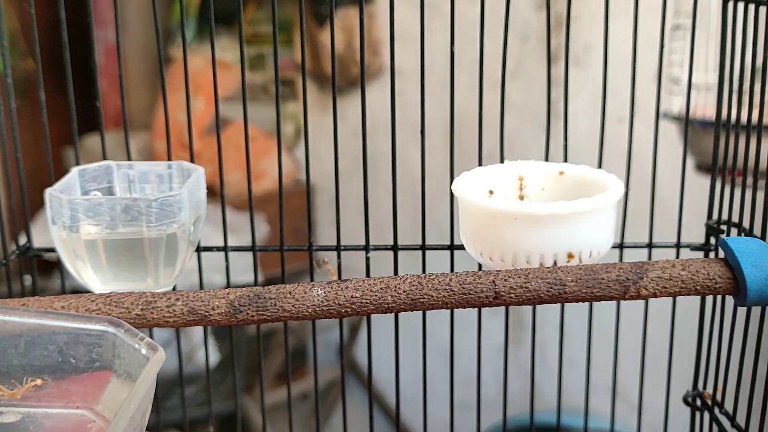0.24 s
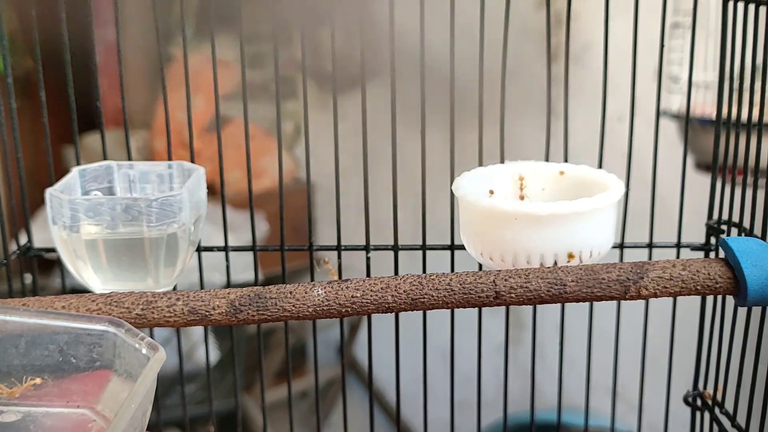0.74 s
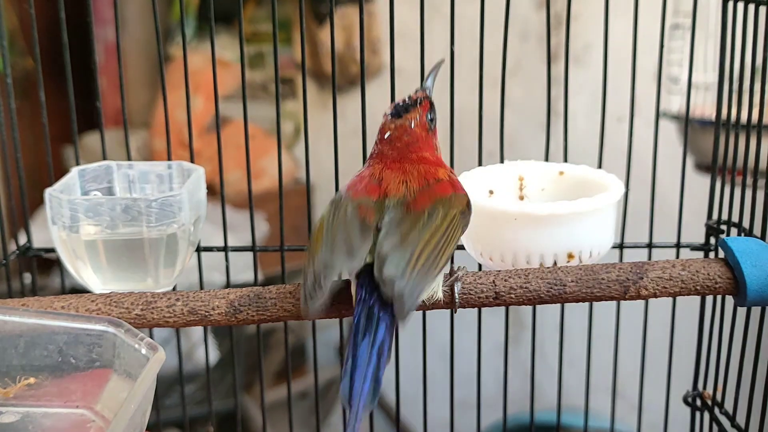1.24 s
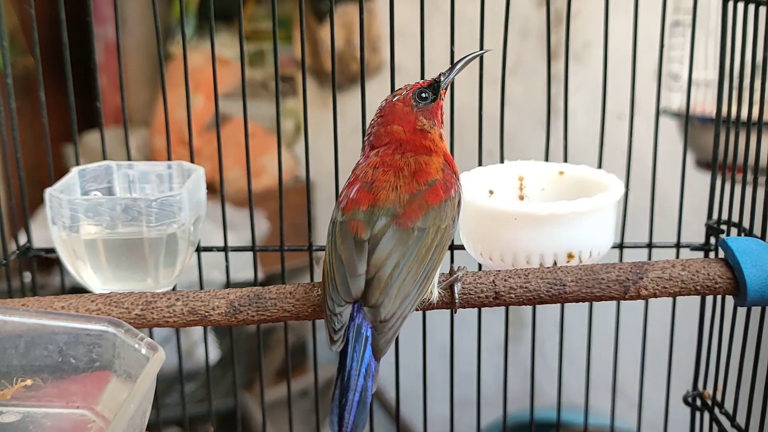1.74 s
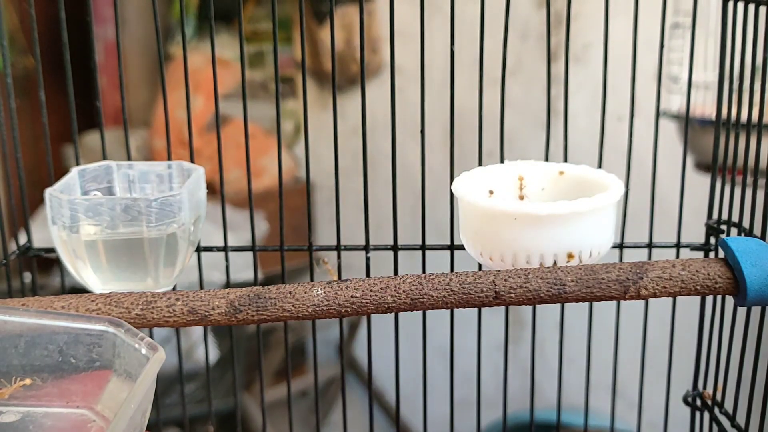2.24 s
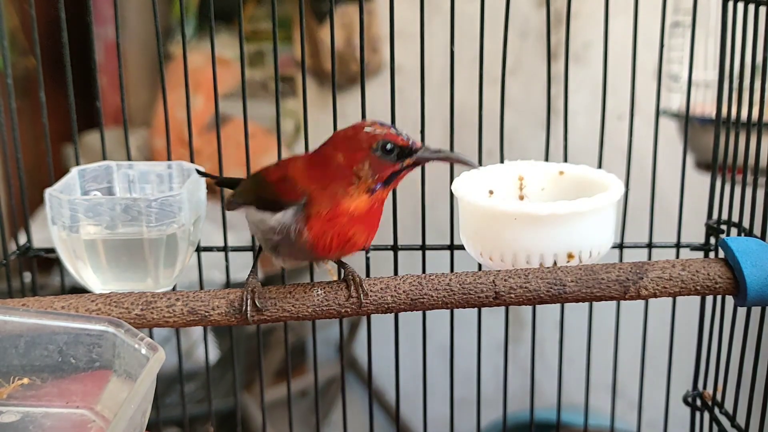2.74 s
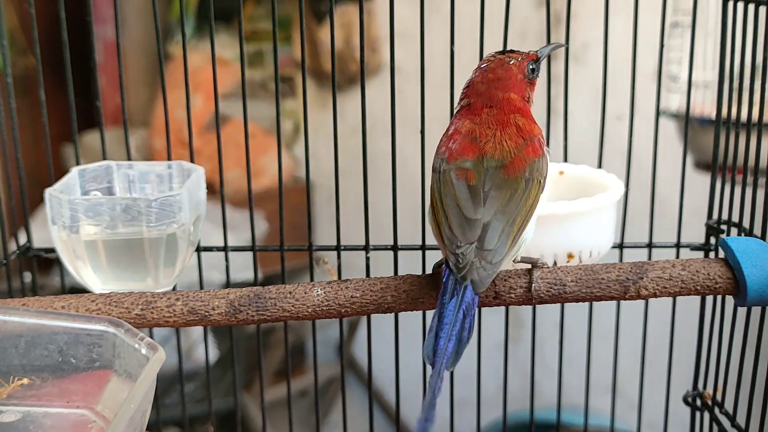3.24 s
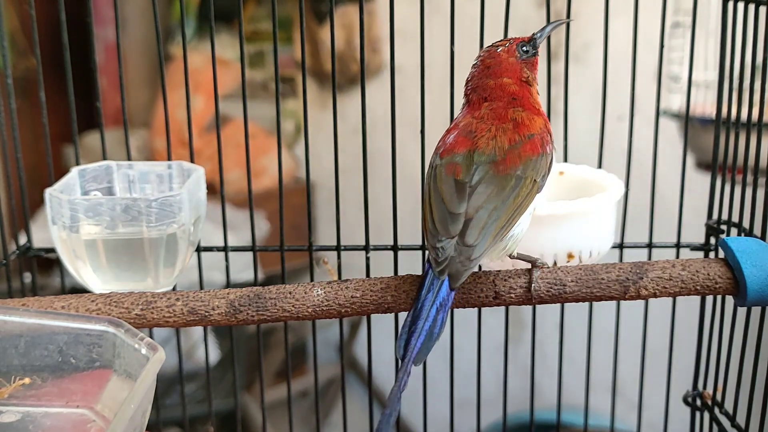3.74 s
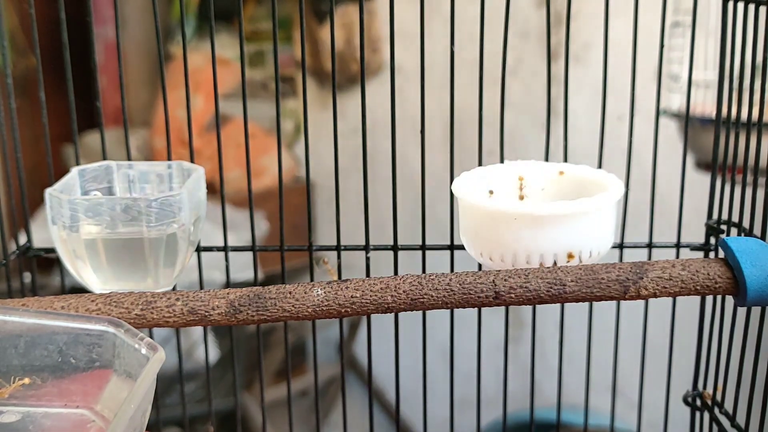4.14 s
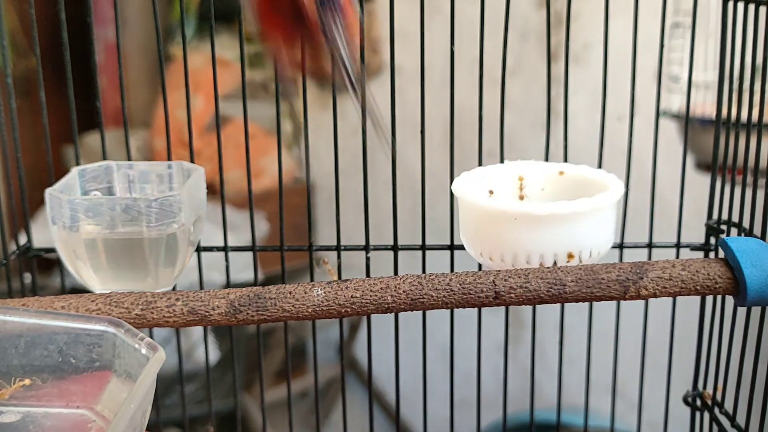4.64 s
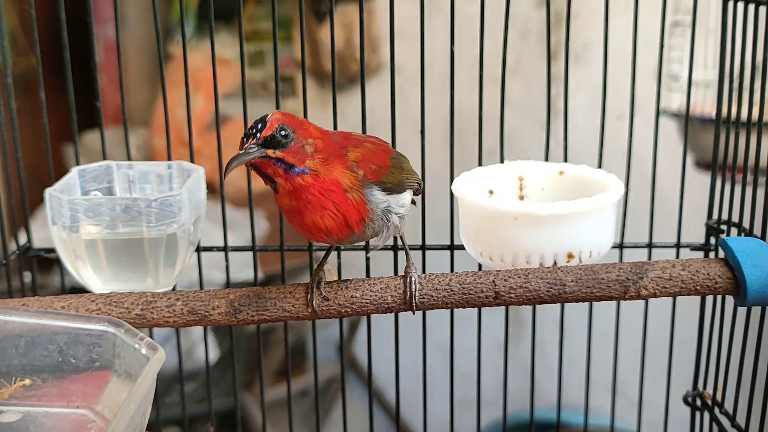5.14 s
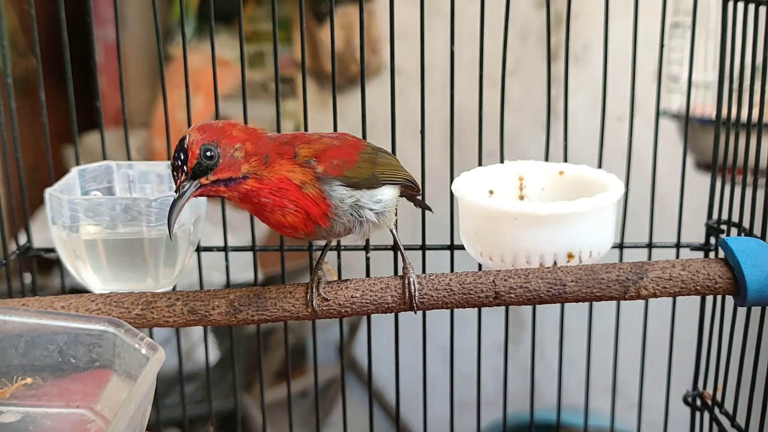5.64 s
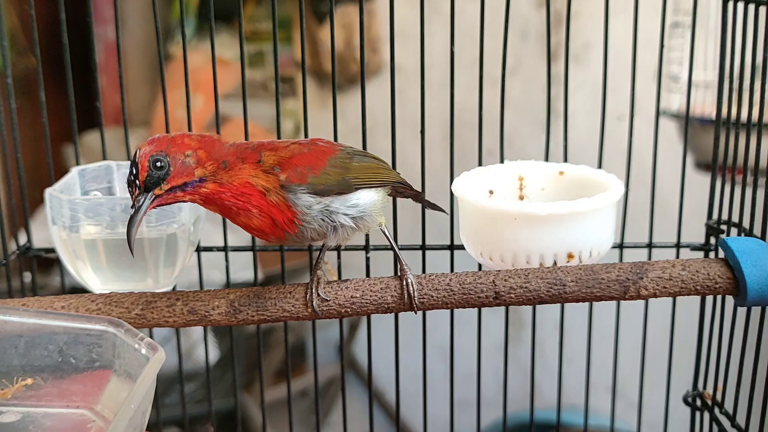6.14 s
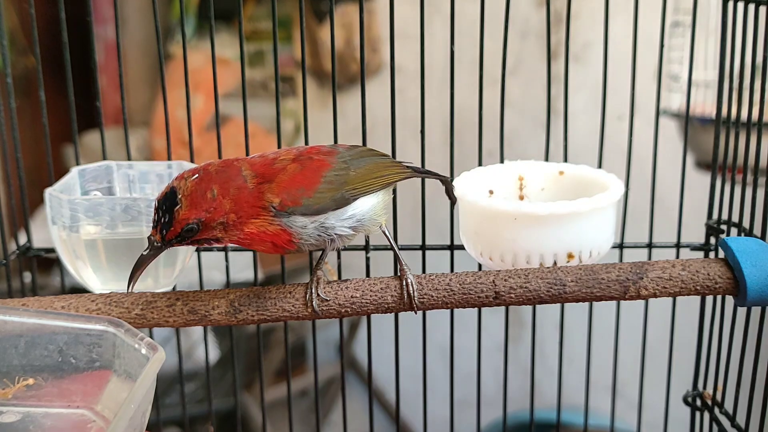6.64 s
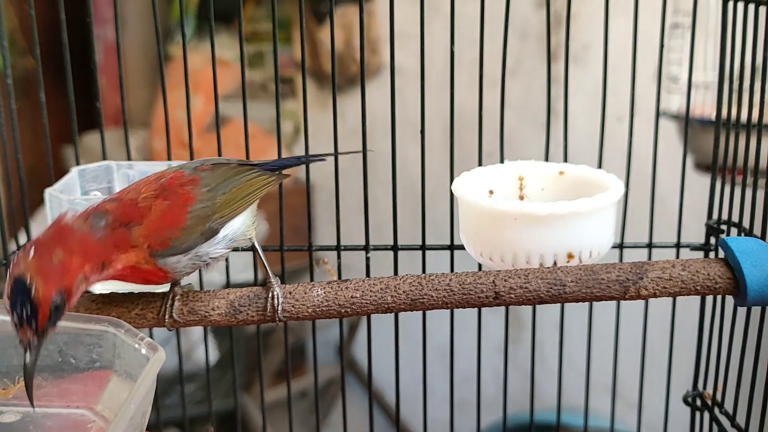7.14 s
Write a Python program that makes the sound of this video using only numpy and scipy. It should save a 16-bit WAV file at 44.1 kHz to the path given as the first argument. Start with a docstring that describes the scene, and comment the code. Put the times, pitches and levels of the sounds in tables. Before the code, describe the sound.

Quiet indoor hum and hiss, with a small bird very near the microphone. Its brief, sharp, high chirps alternate between squeaky rasp and pure whistle, each with a short room echo. They come singly, then in a quick run, then sparsely. Between them are faint wing whirrs, low air puffs and dull woody foot knocks on the perch.

```python
"""A quiet home hums and hisses, and at once a sunbird in a wire cage whistles close to a two-port microphone.
Its syrinx has two sides: one whistles and squeaks in gliding, nearly pure tones, while the other
rasps in pulses whose overtones rise with the pulse rate; surfaces throw the chirps back as echoes.
As it flits about, its feet ring the perch as a sum of decaying modes, its feathers brush the air
as band-passed noise, and its wings push the microphone with slow swings of pressure."""
import sys
import numpy as np
from scipy import signal
from scipy.fft import rfft, irfft
from scipy.io import wavfile
from scipy.ndimage import uniform_filter1d, minimum_filter1d

SR = 44100
rng = np.random.default_rng(int(sys.argv[2]) if len(sys.argv) > 2 else 0)


def generate_wav(signal):
    """Clip the signal to [-1, 1] and save it as 16-bit WAV at the path in sys.argv[1]."""
    frames = np.transpose(np.atleast_2d(signal))
    scaled = np.clip(frames, -1, 1) * 32767
    pcm = np.round(scaled).astype(np.int16)
    wavfile.write(sys.argv[1], SR, pcm)


N = 325458  # length [samples]

# Spectra of the background's three bands: (frequency [Hz], relative density [dB per Hz])
RUMBLE_SPECTRUM = [(12, -23.5), (20, 0), (38, -1.5), (54, -17), (70, -6.5), (102, -8.5), (191, -5.5),
                   (229, -4.5), (360, -9.5), (481, -14), (665, -10.5), (872, -15.5), (1500, -19),
                   (1950, -51.5), (3300, -120)]
HISS_SPECTRUM = [(880, -49), (1500, -12.5), (1660, -2), (1800, -8.5), (1840, -3.5), (1950, -0.5),
                 (2370, -4.5), (2850, -8.5), (3210, -5.5), (6360, -8.5), (7100, -15.5), (7500, -24.5),
                 (9360, -35.5), (15800, -120)]
FIZZ_SPECTRUM = [(4240, -23.5), (7200, -2.5), (7460, -10), (8670, -11), (10200, -6), (14300, -15),
                 (15500, -17.5)]
# Slow swell of the background; only departures from the mean count: (time [s], level [dB])
SWELL = [(0.0, -55), (0.33, -56), (1.171, -51), (1.44, -55), (1.66, -54), (2.03, -52.5), (2.3, -50.5),
         (2.55, -54), (3.16, -57.5), (4.3, -50.5), (4.42, -53.5), (5.12, -57), (5.51, -53), (6.0, -51),
         (6.192, -53.5), (6.66, -51.5), (7.05, -53.5), (7.38, -52)]
# Likeness of the background at the two ports: (frequency [Hz], coherence before a ceiling of 0.9 [0-1])
COHERENCE = [(30, 0.38), (130, 1), (300, 0.68), (1000, 0.31), (4000, 0.38), (15000, 0.46)]
# Phase of the background between the ports: (frequency [Hz], lead of the left port [rad])
PHASE_LEAD = [(0, -0.5), (430, 0.56), (780, -2.5), (1810, -2), (2070, -4), (4390, -12), (6200, -18.5),
              (7410, -16), (8180, -25.5), (8870, -17.5), (9730, -26), (10600, -34), (12900, -45.5),
              (15300, -51)]
RUMBLE_DB, HISS_DB, FIZZ_DB = -52.5, -54.5, -74.5  # level of the mean of both ports, before panning
HISS_UNEVEN_DB = 2  # rms variation of the hiss over time and frequency
WHINE_HZ, WHINE_DB = 1880, -67.5

# Whistled notes, one curve each: (time [s], pitch [Hz], relative level [dB])
WHISTLES = [
    [(0.0, 4060, -11), (0.01, 3980, -31), (0.075, 4000, -42)],
    [(0.079, 4600, -22), (0.084, 4300, -22), (0.091, 4090, -13), (0.1, 3904, -4), (0.114, 3954, 1),
     (0.128, 4050, 1), (0.152, 4096, -5), (0.16, 4327, 2.5), (0.166, 3830, -6.5), (0.174, 3550, -30)],
    [(1.349, 2785, -31.5), (1.357, 3130, -22), (1.368, 3170, -17), (1.381, 3704, -2), (1.388, 2890, -21),
     (1.396, 3170, -15.5), (1.403, 3530, -4.5), (1.412, 3634, -3), (1.422, 3630, -12), (1.434, 3480, -21)],
    [(2.307, 3170, -18.5), (2.324, 3520, -12.5), (2.33, 3200, -29)],
    [(2.476, 3610, -13), (2.488, 3620, -13), (2.493, 3850, -5), (2.502, 4107, -4.5), (2.52, 3805, -7.5),
     (2.528, 3706, -8.5), (2.538, 3744, -11.5), (2.545, 3340, -36)],
    [(2.82, 5255, -16), (2.836, 5080, -3), (2.847, 4875, -5.5), (2.862, 4906, 0), (2.869, 4720, -2.5),
     (2.874, 4530, -6.5), (2.89, 4540, -11.5), (2.899, 4170, -22.5)],
    [(3.108, 5140, -23), (3.116, 5760, -4.5), (3.127, 5770, 2), (3.132, 6080, -5), (3.141, 5630, -5.5),
     (3.155, 5380, -0.5), (3.164, 5160, -19)],
    [(3.163, 5200, -12), (3.174, 5260, -23), (3.18, 5030, -6.5), (3.194, 4990, -3.5), (3.203, 4830, -9.5),
     (3.218, 4726, -8.5), (3.225, 4630, -16)],
    [(6.562, 2680, -29), (6.576, 3137, -13.5), (6.581, 3460, -14), (6.596, 3770, -4.5), (6.607, 3900, -7.5),
     (6.624, 3856, -6.5), (6.632, 3790, -10)],
    [(6.793, 3200, -22.5), (6.811, 3315, -27), (6.818, 3350, -25.5), (6.829, 3476, -18), (6.834, 3800, 3),
     (6.85, 3978, -1.5), (6.858, 3886, 2), (6.868, 3672, -8), (6.885, 3810, -12)],
]
# Direction, voice and room of each chirp: (time [s], left minus right [dB], mean lead of the right port [ms],
# room level [dB], roughness [0-1], brightness of the rasp [dB per octave], overtones of the notes [dB])
POSES = [(0.12, 4, 0.13, -10, 0.06, 6, -45.5), (1.38, 3, -0.064, -10, 0.32, 2, -41.5),
         (2.29, 4.5, 0.027, -2, 0.42, 5.5, -43), (2.5, 10.5, 0.012, -6.5, 0.12, -1, -42.5),
         (2.85, 8, 0.072, -9.5, 0, 0, -39.5), (3.12, 5.5, 0.065, -11.5, 0.07, -1.5, -49),
         (3.17, 1, 0.096, -4.5, 0.1, -7, -51.5), (4.4, 3.5, -0.0042, -7.5, 0.5, -2, -37.5),
         (4.86, 3.5, 0.048, -7, 0.38, 3, -45), (6.6, 2.5, 0.11, -9.5, 0.26, -5, -46.5),
         (6.85, 1.5, 0.098, -7.5, 0.06, -5.5, -54)]
# Rasp that opens a chirp: (start [s], length [s], time to the peak [s], pulse rate aimed for [Hz],
# relative peak level [dB])
RASPS = [(0.071, .014, 0.01, 1845, -28.5), (1.329, 0.058, .026, 1550, -16.5),
         (2.265, 0.038, 0.03, 1505, -24.5), (2.433, 0.049, 0.018, 1695, -28.5),
         (2.805, 0.026, 0.0096, 1843, -33.5), (3.089, 0.023, 0.016, 1696, -33),
         (4.359, 0.052, .024, 1431, -17.5), (4.813, 0.069, 0.02, 1527, -19),
         (6.542, 0.037, 0.022, 1492, -18), (6.785, 0.035, 0.017, 1677, -20)]
# Colour of the rasp before the brightness tilt: a throat band up to 7 kHz, then a steep fall: (frequency [Hz],
# gain [dB])
THROAT = [(1000, -45), (2000, -15), (2900, -6.5), (3400, 5.5), (4300, 10.5), (5900, 10), (7000, 5),
          (7500, -22), (8300, -19), (10000, -26), (14500, -23), (16000, -44)]
# Decay of the room's late tail: (frequency [Hz], time to fall 60 dB [s])
ROOM_DECAY = [(2500, 0.22), (4500, 0.33), (7000, 0.25), (14000, 0.38)]
# Landings of the feet: (time [s], peak level before panning [dB])
STEPS = [(0.906, -34.5), (0.971, -39.5), (1.054, -31), (1.072, -32.5), (2.888, -36.5), (2.914, -34),
         (4.871, -37), (4.896, -41.5), (7.054, -42)]
# Modes of perch and cage: (frequency [Hz], relative level [dB], time to fall 60 dB [s])
PERCH_MODES = [(215.6, -6, 0.34), (250.7, -8, 0.39), (264, -7.5, 0.26), (319, -13, 0.22), (448, -16, 0.051)]
# Feathers brushing the air: (time [s], level [dB], length [s])
RUSTLES = [(0.922, -45.5, 0.012), (0.97, -47.5, 0.048), (2.235, -51, 0.051), (4.31, -58, 0.044)]
# Wings whirring in flight: (time [s], level [dB], length [s])
WHIRRS = [(2.18, -51.5, 0.13), (4.2, -52, 0.097)]
# Wing gusts on the microphone: (time [s], level before panning [dB], swing [Hz], left minus right [dB],
# turbulence relative to the swing [ratio])
GUSTS = [(0.93, -36, 30, 12, 0.26), (0.975, -27, 103, 23.5, 0.53), (0.977, -31, 284, 19, 0.22),
         (1.008, -35, 72, 29, 0.18), (0.977, -26.5, 42, 29.5, 0.22), (1.019, -38.5, 35.8, 31, 0.16),
         (2.221, -43.5, 45, 9, 0.64), (2.26, -43.5, 35.5, -14, 0.45), (3.14, -43, 27.2, 17.5, 0.2),
         (4.267, -41.5, 54.7, 11, 0.17), (4.443, -30.5, 27.2, 10, 0.06), (4.903, -34.5, 26.6, 15, 0.085)]
# Rough strokes that cross inside the chirps: (start [s], length [s], time to the bend [s],
# start pitch [Hz], bend pitch [Hz], end pitch [Hz], relative level [dB], growth over the stroke [dB])
SQUEAKS = [ (1.326, 0.0088, 0.0067, 3400, 4000, 3600, -27, 1),
           (1.339, 0.018, 0.008, 4750, 5250, 5880, -22, 25),
           (1.346, 0.013, 0.005, 5530, 5650, 5450, -9, -13),
           (1.344, 0.028, 0.011, 5800, 6260, 6450, -17, -2),
           (1.345, 0.014, 0.009, 2770, 4380, 4350, -15, 9),
           (1.381, 0.0048, 0.004, 5100, 4940, 4840, -25, -3),
           (1.385, 0.016, 0.0073, 5930, 6000, 6140, -18.5, 2),
           (2.27, 0.016, 0.0058, 5530, 6730, 7100, -21, 2),
           (2.282, 0.017, 0.0075, 4520, 5510, 5820, -10.5, 1),
           (2.283, 0.019, 0.0067, 5620, 6300, 6200, -18, -1),
           (2.275, 0.028, 0.029, 3376, 3810, 3770, -23, -6),
           (2.294, 0.015, 0.0063, 2750, 2860, 2800, -25.5, 4),
           (2.447, 0.033, 0.012, 5460, 7170, 6900, -18, 1),
           (2.457, 0.014, 0.0087, 3840, 3590, 3400, -16.5, -1),
           (3.216, 0.0071, 0.0043, 4850, 4320, 3400, -14.5, 3),
           (4.36, 0.015, 0.0081, 3750, 4010, 4800, -30, 10),
           (4.373, 0.015, 0.008, 5570, 6240, 6700, -9.5, 9), (4.381, 0.028, 0.015, 5630, 6020, 5560, -7, 2),
           (4.387, 0.01, 0.0055, 3780, 4000, 4150, -18, -8), (4.4, 0.019, 0.0097, 4320, 4630, 4670, -12, 3),
           (4.387, 0.02, 0.0089, 6760, 6860, 6850, -15, -3),
           (4.383, 0.02, 0.0079, 2900, 2960, 3000, -28.5, -5),
           (4.413, 0.013, 0.007, 5390, 6440, 6500, -3.5, 3),
           (4.422, 0.02, 0.0052, 6770, 6930, 6320, -5.5, -10),
           (4.415, 0.021, 0.006, 4540, 4950, 5320, -18, 0),
           (4.822, 0.0049, 0.0048, 4700, 4200, 3850, -27, -3),
           (4.825, 0.021, 0.005, 4860, 5700, 6090, -9.5, 8),
           (4.826, 0.022, 0.0127, 3490, 3416, 2880, -15.5, -10),
           (4.83, 0.012, 0.007, 6700, 7000, 6700, -19, 0),
           (4.841, 0.036, 0.0089, 6190, 5490, 5480, -6, -13),
           (4.844, 0.022, 0.0072, 3030, 2770, 2830, -22, -4),
           (4.854, 0.013, 0.0065, 3220, 3540, 3860, -37, 0),
           (4.848, 0.023, 0.011, 6200, 6350, 6080, -9.5, 2),
           (4.869, 0.012, 0.0076, 4670, 4910, 5780, -5, 0),
           (4.874, 0.021, 0.015, 6120, 6850, 7000, -10, -4),
           (4.891, 0.0082, 0.005, 6440, 6220, 5600, -3.5, 0),
           (6.551, 0.014, 0.0084, 3500, 3420, 3260, -8.5, 0),
           (6.558, 0.016, 0.012, 4780, 6200, 6400, -8.5, -9),
           (6.552, 0.018, 0.0063, 5600, 5900, 5970, -13.5, 3),
           (6.56, 0.009, 0.0045, 6750, 6600, 6700, -40, 0),
           (6.798, 0.034, 0.015, 6400, 6700, 6830, -24, -8.5)]

NOTE_ATTACK_S, NOTE_RELEASE_S = 0.0029, 0.0028
NOTE_TOP_HZ = 7250  # ceiling on the fundamental alone
WAVER_DB, WAVER_HZ = 1.6, 80  # rms waver of a note's level, and its rate
WOBBLE, WOBBLE_HZ = 0.0077, 130  # rms share by which a note's pitch wanders, and its rate
RASP_START_HZ, RASP_CLIMB = 924.4, 1.4  # the pulse rate climbs for this many times the rise of the level
RASP_ONSET_DB, RASP_END_DB = -17, -9  # against the peak
RASP_FLUTTER, RASP_JITTER, RASP_NOISE_DB = 0.28, 0.04, -8
LEAD_SCATTER_MS = 0.073  # spread of direction between the strokes of a chirp of roughness 1
EDGE_HZ = 15550  # upper band limit


def gain_of(db):
    """Decibel definition: 20 dB is a factor of ten in amplitude."""
    return 10 ** (np.asarray(db) / 20)


def evened(x):
    """Normalization: scales to an rms of 1."""
    return x / np.sqrt(np.mean(x ** 2) + 1e-20)


def read(points, hz):
    """Interpolation of a spectrum along a logarithmic frequency axis."""
    f, value = np.transpose(points)
    return np.interp(np.log(hz + 1), np.log(f + 1), value)


def add(mix, s, sound):
    """Superposition: adds a stereo sound to the mix at time s."""
    part = mix[:, max(round(s * SR), 0):][:, :sound.shape[1]]
    part += sound[:, :part.shape[1]]


def panned(x, pan_db):
    """Level difference: splits a sound between left and right."""
    return x * gain_of([[pan_db / 2], [-pan_db / 2]])


def wander(size, hz):
    """Low-pass noise: smooth chance, scaled to an rms of 1, that rolls off above hz."""
    f = np.fft.rfftfreq(size + 4096, 1 / SR)
    spectrum = rfft(rng.standard_normal(2 * len(f) - 2))
    smooth = irfft(spectrum / (1 + (f / hz) ** 4))
    return evened(smooth)[:size]


def wash(spectrum, db, pan_db, uneven_db, follow):
    """Partially coherent noise: a swelling band, uneven over time and frequency, out of phase at the ports."""
    frames, hz = N // 512 + 5, np.fft.rfftfreq(2048, 1 / SR)
    a, b, c, d, uneven = rng.standard_normal((frames, len(hz), 5)).T
    uneven = uniform_filter1d(uneven, size=12, axis=0)
    uneven = evened(uniform_filter1d(uneven, size=10, axis=1))
    s, swell_db = np.transpose(SWELL)
    swell_db = np.interp(np.linspace(0, N / SR, frames), s, swell_db - swell_db.mean())

    same = np.clip(read(COHERENCE, hz), 0, .9)[:, None]
    lead = np.interp(hz, *np.transpose(PHASE_LEAD))[:, None]
    left = a + 1j * b
    right = same * left * np.exp(-1j * lead) + np.sqrt(1 - same ** 2) * (c + 1j * d)
    z = np.array([left, right]) / np.sqrt(1 + same * np.cos(lead))  # the sum of both ports keeps the spectrum
    z *= gain_of(read(spectrum, hz)[:, None] + uneven_db * uneven + follow * swell_db)
    noise = signal.istft(z, nperseg=2048, noverlap=1536)[1][:, :N]
    return panned(gain_of(db) * noise / noise.mean(0).std(), pan_db)


def home():
    """Ambient noise: distant rumble, soft hiss, a high fizz and the faint, wavering whine of an appliance."""
    whine_hz = WHINE_HZ + 2.3 * wander(N, 6.1)
    whine = np.sin(2 * np.pi * np.cumsum(whine_hz) / SR)
    rumble = wash(RUMBLE_SPECTRUM, RUMBLE_DB, pan_db=1.0, uneven_db=2.5, follow=0.9)
    hiss = wash(HISS_SPECTRUM, HISS_DB, pan_db=0.0, uneven_db=HISS_UNEVEN_DB, follow=0.95)
    fizz = wash(FIZZ_SPECTRUM, FIZZ_DB, pan_db=-1.0, uneven_db=6.5, follow=1.2)
    return rumble + hiss + fizz + gain_of(WHINE_DB) * evened(whine)


def pose(s):
    """Nearest neighbour in time: the row of the chirp closest to time s."""
    return min(POSES, key=lambda row: abs(row[0] - s))


def membrane(hz, jitter, jitter_hz):
    """Frequency modulation: a membrane follows its tension smoothly, with a tremble; phase sums pitch."""
    pitch = uniform_filter1d(hz, size=130) * (1 + jitter * wander(len(hz), jitter_hz))
    return pitch, 2 * np.pi * np.cumsum(pitch) / SR


def gate(t, attack, release):
    """Amplitude envelope: linear attack, hold and linear release over the times t."""
    return np.clip(np.minimum(t / attack, (t[-1] - t) / release), 0, 1)


def tone(s, glide, db, jitter, flutter, third_db=-2):
    """Harmonic series: a gliding fundamental with two faint overtones, shaken in pitch and level when rough."""
    t = np.arange(len(glide)) / SR
    rough, overtone_db = pose(s)[4], pose(s)[6]
    wobbled = glide * (1 + WOBBLE * wander(len(t), WOBBLE_HZ))
    _, phase = membrane(wobbled, jitter * rough, jitter_hz=376)
    level = gain_of(db + WAVER_DB * wander(len(t), WAVER_HZ)) * gate(t, NOTE_ATTACK_S, NOTE_RELEASE_S)
    shake = evened(np.exp(flutter * rough * wander(len(t), 380)))
    level = level * np.sqrt(2) * shake
    overtones = gain_of(overtone_db) * (np.sin(2 * phase) + gain_of(third_db) * np.sin(3 * phase))
    ceiling = signal.butter(16, NOTE_TOP_HZ, fs=SR, output="sos")
    return signal.sosfilt(ceiling, level * np.sin(phase)) + level * overtones


def whistle(note):
    """Tonal phonation: a nearly pure tone follows the pitch and level curve of one note."""
    s, hz, db = np.transpose(sorted(note))
    t = np.arange(s[0], s[-1], 1 / SR)
    return s[0], tone(s[0], np.interp(t, s, hz), np.interp(t, s, db), jitter=0.031, flutter=0.59)


def rasp(s, length, peak_s, top_hz, peak_db, attack=0.008, release=0.0017):
    """Source-filter principle: uneven pulses speed up as they swell; the throat shapes them and turbulence."""
    t = np.arange(0, length, 1 / SR)
    rate = np.interp(t, [0, RASP_CLIMB * peak_s], [RASP_START_HZ, top_hz])
    pitch, phase = membrane(rate, jitter=RASP_JITTER, jitter_hz=434)
    swell_db = np.interp(t, [0, peak_s, length], [RASP_ONSET_DB, 0, RASP_END_DB])
    level = gain_of(peak_db + swell_db) * gate(t, attack, release)

    brightness = pose(s)[5]
    throat = [(hz, db + brightness * np.log2(hz)) for hz, db in THROAT]  # a wider beak is brighter
    stack = 0
    for k in range(1, 15):
        audible = k * pitch < SR / 2
        stack = stack + gain_of(read(throat, k * pitch)) * audible * np.cos(k * phase)
    colour = gain_of(read(throat, np.fft.rfftfreq(len(t), 1 / SR)))
    turbulence = irfft(rfft(rng.standard_normal(len(t))) * colour, len(t))
    voice = evened(stack) + gain_of(RASP_NOISE_DB) * evened(turbulence)
    return level * evened(voice * (1 + RASP_FLUTTER * wander(len(t), 1300)))


def room(early_t60=0.073, late_db=-5, first=0.0024, echoes_per_s=450):
    """Impulse response: close surfaces give sparse early echoes, the walls a tail that decays by frequency."""
    t = np.arange(SR // 2) / SR
    signs = rng.choice([-1., 1.], (2, len(t)))
    hits = rng.random(signs.shape) < echoes_per_s / SR
    early = signs * hits * (t > first) * gain_of(-60 * t / early_t60)
    hz, age, z = signal.stft(signs * (t > .012), SR, nperseg=256)
    decay = gain_of(-60 * age / read(ROOM_DECAY, hz)[:, None])
    late = signal.istft(z * decay, SR, nperseg=256)[1][:, :len(t)]
    return (evened(early) + gain_of(late_db) * evened(late)) / np.sqrt(len(t))


def placed(s, x):
    """Stereo localization: direct sound with level and time differences, plus echoes by convolution."""
    _, pan_db, lead_ms, room_db, rough, *_ = pose(s)
    lead_ms = lead_ms + LEAD_SCATTER_MS * rough * rng.standard_normal()
    echo = signal.fftconvolve(x[None], room(), axes=1)
    size = echo.shape[1]
    delay_s = np.array([[lead_ms], [-lead_ms]]) / 2000  # half to each port, ms to s
    lag = np.exp(-2j * np.pi * np.fft.rfftfreq(size, 1 / SR) * delay_s)
    direct = irfft(rfft(x, size) * lag, size) * evened(panned(1, pan_db))
    direct_rms = np.sqrt(np.mean(direct ** 2))
    return direct + gain_of(room_db) * evened(echo) * direct_rms


def bird(whistle_db=-6.5, squeak_db=-9.5, rasp_db=-1):
    """Two-source phonation: both sides of the syrinx superposed."""
    out = np.zeros((2, N))
    for s, sound in map(whistle, WHISTLES):
        add(out, s, gain_of(whistle_db) * placed(s, sound))
    for s, *burst in RASPS:
        add(out, s, gain_of(rasp_db) * placed(s, rasp(s, *burst)))
    for s, *stroke in SQUEAKS:
        add(out, s, gain_of(squeak_db) * placed(s, squeak(s, *stroke)))
    return out


def perch(pan_db=11, rise=0.001):
    """Modal synthesis: soft landings ring the low, exponentially decaying modes of perch and cage."""
    out, t = np.zeros((2, N)), np.arange(SR // 2) / SR
    for s, db in STEPS:
        ring = 0
        for hz, mode_db, t60 in PERCH_MODES:
            decay = gain_of(mode_db - 60 * t / t60)
            ring = ring + decay * np.sin(2 * np.pi * (hz * t + rng.random()))
        ring = ring * (1 - np.exp(-t / rise))  # soft onset
        knock = gain_of(db) * ring / abs(ring).max()
        add(out, s, panned(knock, pan_db / 2) * gain_of([[0], [-pan_db / 2]]))
    return out


def feathers(swishes, low_hz, high_hz):
    """Band-passed flow noise: soft, narrow swishes of air through the wing feathers."""
    t = np.arange(N) / SR
    swell = sum(gain_of(db) * np.exp(-((t - s) / length) ** 2) for s, db, length in swishes)
    band = signal.butter(2, [low_hz, high_hz], "bandpass", fs=SR, output="sos")
    return swell * evened(signal.sosfilt(band, rng.standard_normal((2, N))))


def wings(eddy_hz=230):
    """Near-field pressure: each gust is a slow swing under a Gaussian envelope, with turbulent eddies."""
    out, t = np.zeros((2, N)), np.arange(-.06, .06, 1 / SR)
    for s, db, hz, pan_db, turbulence in GUSTS:
        swell = np.exp(-(1.9 * hz * t) ** 2)
        push = np.cos(2 * np.pi * hz * t) + turbulence * wander(len(t), eddy_hz)
        add(out, s + t[0], panned(gain_of(db) * swell * push, pan_db))
    return out


def squeak(s, length, bend_s, start_hz, bend_hz, end_hz, db, growth_db):
    """Rapid frequency sweep: a brief stroke darts to its bend and away."""
    t = np.arange(0, length, 1 / SR)
    glide = np.interp(t, [0, bend_s, length], [start_hz, bend_hz, end_hz])
    return tone(s, glide, db + growth_db * (t / length - .5), jitter=0.047, flutter=0.43)


def scene():
    """Superposition of the home, the bird's voice and its movements."""
    rustles = feathers(RUSTLES, low_hz=3230, high_hz=3900)
    whirrs = feathers(WHIRRS, low_hz=480, high_hz=705)
    return home() + bird() + perch() + rustles + whirrs + wings()


def record(dry):
    """Peak limiting and low-pass filtering: a quick gain holds peaks under full scale before the band limit."""
    gain = np.minimum(1, .9 / (abs(dry).max(0) + 1e-9))
    gain = uniform_filter1d(minimum_filter1d(gain, size=220), size=220)
    band_limit = signal.firwin(511, EDGE_HZ, window=("kaiser", 9), fs=SR)
    return signal.oaconvolve(dry * gain, band_limit[None], "same")


dry = scene()
out = record(dry)
generate_wav(out)
```